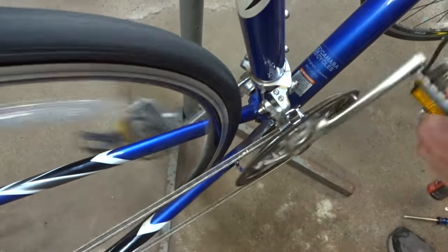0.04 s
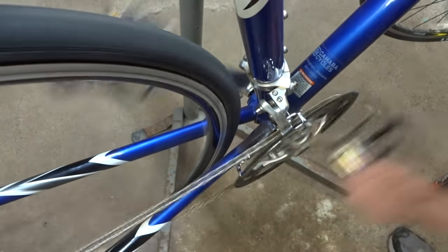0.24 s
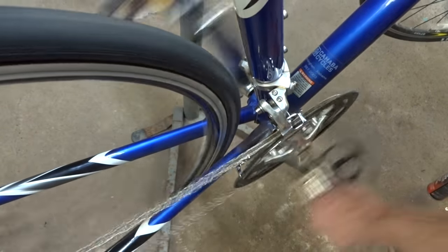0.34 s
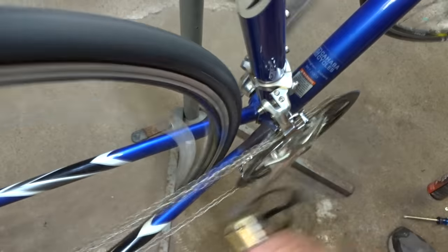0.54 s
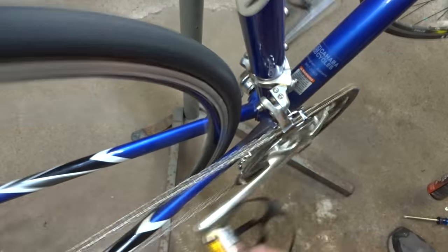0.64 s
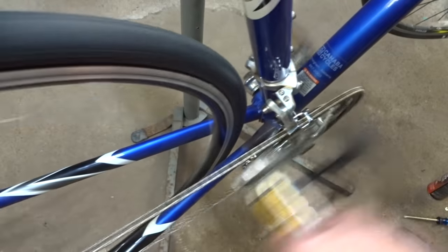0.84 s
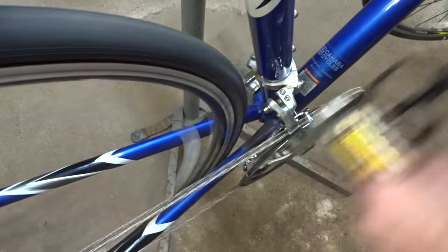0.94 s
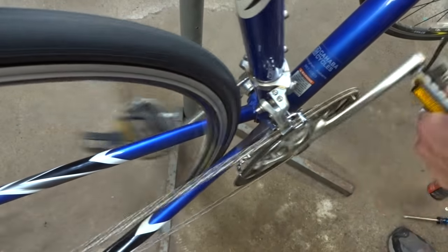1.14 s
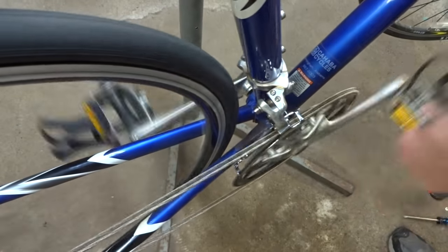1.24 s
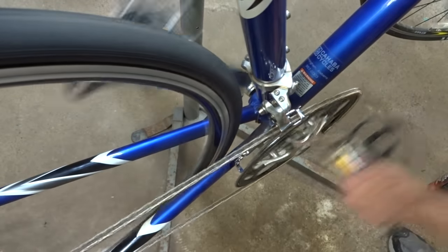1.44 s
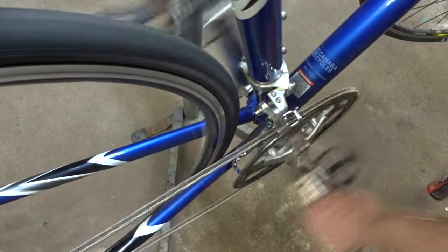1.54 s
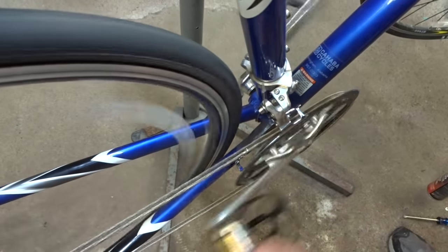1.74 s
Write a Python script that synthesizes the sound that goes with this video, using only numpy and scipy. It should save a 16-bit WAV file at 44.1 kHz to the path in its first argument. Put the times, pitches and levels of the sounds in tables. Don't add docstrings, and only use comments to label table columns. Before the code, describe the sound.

Close-up bicycle chain and gears: light ticking, a long jangling metal clatter, brisk uneven clicking, a second sharp burst of clanks, then steady ticks over faint wheel hum and quiet workshop air.

```python
import sys
import numpy as np
from scipy import signal
from scipy.fft import rfft, irfft
from scipy.io import wavfile
from scipy.ndimage import uniform_filter1d, minimum_filter1d

SR = 44100
rng = np.random.default_rng(int(sys.argv[2]) if len(sys.argv) > 2 else 0)


def put_to_file(sound):
    columns = np.atleast_2d(sound).T
    safe = np.clip(columns, -1, 1)
    whole_steps = np.round(safe * 32767)
    wavfile.write(sys.argv[1], SR, whole_steps.astype(np.int16))


def boost(x):
    u = np.asarray(x, float) / 20
    return 10 ** u


N = 79380

# f/Hz, level/dB per Hz
SHOP_AIR = [(12, -57), (20, -27), (150, -3), (499, 1.5), (2080, -8), (9670, -7.5), (16000, -12)]
# f/Hz, width/Hz, level/dB
WHEEL_HUM = [(76, 100, -63), (125.2, 23.3, -60.5), (174, 31, -56)]
# t/s, level over the hum/dB
SHUDDERS = [
    (.57, 9),
    (1.239, 18),
    (1.378, 14.5),
]

# t/s, peak level/dB
SEATS = [(0.0024, -46), (0.022, -37), (0.0474, -34), (0.0744, -26.5), (0.0927, -35), (0.116, -25),
         (0.1406, -31), (0.161, -35), (0.187, -22.5), (0.202, -29), (0.2214, -26), (0.754, -23),
         (0.784, -28), (0.827, -30), (0.85, -21), (0.864, -22), (0.8914, -24), (0.9144, -26.5),
         (0.9353, -21), (0.9494, -34), (0.9986, -29), (1.041, -25), (1.1204, -21.5), (1.1487, -24),
         (1.1787, -29), (1.1914, -35), (1.5843, -30), (1.6122, -26), (1.6274, -24), (1.6487, -24),
         (1.668, -21), (1.695, -23.5), (1.7235, -25.5), (1.746, -24), (1.7722, -23.5)]
# t/s, peak level/dB
SNAPS = [(0.0513, -31), (0.0984, -34), (0.141, -25), (0.1986, -32), (0.7344, -25), (0.7454, -31),
         (0.7627, -25), (0.7843, -34), (0.8084, -34), (0.826, -20.5), (0.8485, -35), (0.8754, -32),
         (0.9004, -23), (0.9084, -24), (0.918, -31), (0.9407, -21.5), (0.9554, -42), (0.961, -28),
         (0.986, -22.5), (1.0076, -22), (1.0154, -38), (1.0232, -18), (1.0415, -21), (1.053, -23),
         (1.0984, -26), (1.1204, -31), (1.1277, -28), (1.1374, -29), (1.1542, -24), (1.162, -20),
         (1.1814, -25), (1.191, -26), (1.6084, -32), (1.6212, -27), (1.637, -29), (1.644, -23),
         (1.6706, -23.5), (1.6872, -23.5), (1.694, -30), (1.722, -29), (1.733, -26.5), (1.7484, -26),
         (1.774, -33), (1.7816, -22.5)]
# f/Hz, level/dB per Hz
ROLLER_COLOUR = [(88, -25), (150, 12), (321, -7), (637, -36), (2600, 3.5), (9630, 18), (16000, -30)]
# f/Hz, width/Hz, level/dB
SEAT_RINGS = [(10000, 810, -10), (11000, 500, -26.5), (13200, 480, -2.5)]
# f/Hz, width/Hz, level/dB
PAWL_RINGS = [(6900, 520, 1), (8200, 2200, -4.5), (9500, 2000, 1)]

# t/s, level/dB, frame thud/dB, cage jingle/dB, f of the part struck/Hz
FIRST_SHIFT = [(0.2596, -6, -20, -4.5, 2770), (0.264, -16.5, -9, 11, 12800), (0.283, -14, -27, 2, 10500),
               (0.2918, -7, -23, -12, 2660), (0.3168, 1.5, -11, -17, 2690), (0.339, -8.5, -27, 3, 14200),
               (.346, -7, -10, 1, 3730), (0.3715, -3, -6, -4, 10350), (0.386, -11, -22, -10, 3540),
               (0.406, -4, -13.5, -3.5, 2690), (0.4286, -12, -6.5, -25, 2600),
               (0.4378, -17.5, -11, -10, 1244), (0.449, -7, -9.5, -23, 4760), (0.4906, -7, -14, -19, 2690),
               (0.5036, 2.5, -16.5, -8.5, 4200), (0.527, -8.5, -20, -12, 4180), (0.542, -6, -16, -21, 4000),
               (0.556, -5, -27, 2.5, 10550), (0.5542, -1, -36, -12, 5250), (0.563, -11.5, -27, -22, 2670),
               (0.581, -25, -30, 8, 10650), (0.61, -13.5, -9, 1, 2690), (0.6146, -4.5, -37, -17, 5250),
               (.628, -14, -16, -19, 2700)]
# t/s, level/dB, frame thud/dB, cage jingle/dB, f of the part struck/Hz
SECOND_SHIFT = [(1.228, -19, -1, 7.5, 426), (1.242, -29, -4, -17, 445), (1.25, -20.5, -7, -14, 4000),
                (1.3743, 0, -13, -5, 5400), (1.382, -16, -2, -4, 1270), (1.388, -5.5, -6, -6, 3060),
                (1.3997, -13.5, -4.5, -10, 1270), (1.401, -7.5, -29, -26, 3150),
                (1.408, -9, -17, -27, 2550), (1.415, -8.5, -3, -3, 3350), (1.42, -10.5, -26, 0.5, 10730),
                (1.425, -13, -22, -8, 13000), (1.428, -15, -25, -18, 2570), (1.441, -9, -25, -13, 2510),
                (1.4435, -5.5, -14, 2.5, 4750), (1.457, -16, -33, 1, 4250), (1.49, -20, -4, -17, 4250),
                (1.575, -18.5, -13, -26, 4120), (1.585, -22.5, -10.5, -8, 4200)]
# t/s, level/dB, frame thud/dB, cage
# jingle/dB, f of the part struck/Hz
KNOCKS = [(0.093, -20, -15, -8, 1170), (0.179, -27.5, -6, -10, 910), (0.2317, -15.5, -13.5, -10, 2680),
          (0.243, -11, -21, -4.5, 2600), (0.3093, -0.5, -4.5, -17, 1980), (0.685, -14, -4.5, 4, 10040),
          (0.6865, -16.5, -5.5, -20, 630), (0.8008, -23, -21, 0, 11000), (0.888, -23, -6.5, -4, 8400),
          (0.973, -18, -14, -16, 4306), (.909, -25.5, -6, -4, 745), (1.0272, -30.5, -24, 8.5, 14100),
          (1.0797, -11.5, -12, 4, 1010), (1.177, -29.5, -0.5, -10, 1040), (1.2229, -5.5, -3, -18, 1280),
          (1.2234, -15, -24, -18, 4280), (1.2246, -4, -15, -20, 2470), (1.632, -23.5, -13, -8, 1610),
          (1.672, -35, 5.5, -6, 1394)]
# t/s, level/dB, frame thud/dB, cage jingle/dB
CHAIN_DRAG = [(0.248, -43, 2, 0.5), (.27, -22.5, -12, -4), (0.316, -22.5, 5, 0.5), (0.459, -24, 4.5, -3),
              (.5, -41.5, 8, -0.5), (0.568, -29.5, 8.5, 5), (.64, -29, -4, -0.5), (.72, -56, 16, 12.5),
              (1.1, -38.5, 2, 1.5), (1.22, -45.5, 9.5, 7.5), (1.238, -24, 6.5, -11.5), (1.372, -39, 3.5, 3),
              (1.377, -27, -5, 4.5), (1.46, -24, -4, -7.5), (1.58, -50.5, 9, 3), (1.8, -87, -48, -13)]
# f/Hz, level/dB per Hz
CONTACT_COLOUR = [(88, -46), (150, -21), (420, -2.5), (1300, -9), (2000, -4), (2700, -3.5), (7000, -5.5),
                  (15000, -2.5)]
# f/Hz, width/Hz, level/dB
METAL_RINGS = [(1270, 114, 1), (1926, 33, -5.5), (2443, 29, -0.5), (2690, 50, -0.5), (3105, 81, -1.5),
               (4000, 55, 3), (4250, 110, 1), (4750, 50, 0.5), (5250, 230, 2), (7940, 50, -1),
               (9750, 1600, 9.5), (12670, 230, 4.5), (13900, 230, -18)]
# f/Hz, width/Hz, level/dB
FRAME_RINGS = [(250, 24, -6.5), (415, 18, -15.5), (553, 32, 5), (1072, 12, -1.5)]
ZONES_HZ = [1400, 2300, 5300, 8000]

BANDS_HZ = 100 * 2 ** np.arange(0, 7.3, 0.4)
RISE_S = 0.0005


def table(points, hz):
    points = np.array(points)
    return np.interp(np.log(hz), np.log(np.maximum(points[:, 0], 1)), points[:, 1])


def ring(x, hz, width):
    r = np.exp(-np.pi * np.clip(width, 5, hz) / SR)
    a = [1, -2 * r * np.cos(2 * np.pi * min(hz, SR / 2.2) / SR), r * r]
    return signal.lfilter([1, 0, -1], a, x) * np.sqrt((1 - r * r) / 2)


def broad(colour):
    shares = table(colour, BANDS_HZ) + 10 * np.log10(BANDS_HZ)
    shares = shares - 10 * np.log10(np.sum(10 ** (shares / 10)))
    return [(f, f / 4, db) for f, db in zip(BANDS_HZ, shares)]


def walk(rate):
    k = int(SR / rate)
    return uniform_filter1d(np.repeat(rng.standard_normal(N // k + 1), k), k)[:N]


def grit():
    sizes = boost(3 * np.minimum(rng.exponential(size=N), 5))
    return sizes / np.sqrt(np.mean(sizes ** 2))


def bursts(times, db, decay_s):
    hits = np.zeros(N)
    np.add.at(hits, np.clip(times * SR, 0, N - 1).astype(int), boost(db))
    decay = np.exp(-1 / (decay_s * SR))
    rise = np.exp(-1 / (RISE_S * SR))
    fading = signal.lfilter([1], [1, -decay], hits)
    return signal.lfilter([1 - rise], [1, -rise], fading)


def zones(hz):
    low = np.interp(np.log(hz), np.log(ZONES_HZ), [1, 0, 0, 0])
    high = np.interp(np.log(hz), np.log(ZONES_HZ), [0, 0, 0, 1])
    return low, high


def shop():
    hz = np.maximum(np.arange(N // 2 + 1) * SR / N, 1)
    air = irfft(rfft(rng.standard_normal((2, N))) * boost(table(SHOP_AIR, hz)), N)
    return air / air.std() * boost([[-43], [-50.5]])


def room(x):
    t60_s, treble_t60_s = 0.76, 0.23
    t = np.arange(SR) / SR
    noise = rng.standard_normal((2, SR))
    low = signal.lfilter([0.3], [1, -0.7], noise)
    tail = low * boost(-60 * t / t60_s) + (noise - low) * boost(-60 * t / treble_t60_s)
    tail = tail * np.clip(t / 0.025, 0, 1)
    tail = tail / np.sqrt(np.sum(tail[0] ** 2)) * boost([[-10], [-24]])
    return signal.fftconvolve(x[None], tail, axes=1)[:, :N]


def wheel():
    jolts = bursts(*np.array(SHUDDERS).T, decay_s=0.076)
    swell = 1 + uniform_filter1d(jolts, size=SR // 30)
    out = 0
    for hz, width, db in WHEEL_HUM:
        hum = ring(ring(rng.standard_normal(N), hz, width), hz, 3 * width)
        out = out + boost(db - 27.5 + 2 * walk(5.35)) * swell * hum
    return out


def ticks(events, parts, extra_db, decay_s, contact):
    times, db = np.array(events).T
    out = 0
    for hz, width, part_db in parts:
        scatter_db = 2 * rng.standard_normal(len(times))
        push = bursts(times, db + extra_db + scatter_db, decay_s)
        out = out + boost(part_db) * ring(push * contact * rng.standard_normal(N), hz, width)
    return out


def teeth():
    contact = grit()
    seated = ticks(SEATS, broad(ROLLER_COLOUR) + SEAT_RINGS, -10, 0.004, contact)
    snapped = ticks(SNAPS, PAWL_RINGS, -3.5, 0.0005, contact)
    return seated + snapped


def pings(blows):
    t = np.arange(SR // 20) / SR
    hz = blows[:, 4:]
    low, high = zones(hz)
    db = blows[:, 1:2] + low * (blows[:, 2:3] + 8) + high * (blows[:, 3:4] + 4) - 10
    detune, phase = 0.025 * rng.standard_normal((2, len(hz), 1))
    partner = np.sin(2 * np.pi * (hz * (1 + detune) * t + 20 * phase))
    tone = np.sin(2 * np.pi * hz * t) + 0.5 * partner
    fade = np.exp(-t / 0.0048) * (1 - np.exp(-t / RISE_S))
    out = np.zeros(N + len(t))
    starts = (blows[:, :1] * SR).astype(int)
    np.add.at(out, starts + np.arange(len(t)), boost(db) * tone * fade)
    return out[:N]


def clatter():
    t = np.arange(N) / SR
    parts = broad(CONTACT_COLOUR)
    parts = parts + [(f, max(w, 55), db - 18) for f, w, db in METAL_RINGS]
    parts = parts + [(f, w, db - 26) for f, w, db in FRAME_RINGS]
    # blows, decay of the rattle in s, strength of the sharp crack
    groups = [(np.array(FIRST_SHIFT + SECOND_SHIFT), 0.0043, 1.5), (np.array(KNOCKS), 0.0032, 4)]
    drag = np.array(CHAIN_DRAG)
    drag_db, drag_thud, drag_jingle = [np.interp(t, drag[:, 0], drag[:, k]) for k in (1, 2, 3)]
    contact, shake, out = grit(), walk(90), 0
    for k, (hz, width, db) in enumerate(parts):
        low, high = zones(hz)
        flicker_db = 2.5 * (shake + walk(59.97))
        push = boost(drag_db + low * drag_thud + high * drag_jingle + flicker_db)
        crack = np.zeros(N)
        for blows, decay_s, sharp in groups:
            times, level, thud, jingle, struck_hz = blows.T
            octaves_away = np.log2(hz / struck_hz)
            struck_db = 5 * np.exp(-(octaves_away / 0.09) ** 2)
            scatter_db = 1.5 * rng.standard_normal(len(blows))
            size = level + low * (thud + 12) + high * (jingle + 4) - 7 + scatter_db + struck_db
            push = np.hypot(push, bursts(times, size, decay_s))
            np.add.at(crack, (times * SR + 8).astype(int), sharp * boost(size))
        rattle = push * contact * rng.standard_normal(N)
        out = out + boost(db) * ring(rattle + crack * (-1) ** k, hz, width)
    return signal.sosfilt(signal.butter(4, 170, "high", fs=SR, output="sos"), out)


def scene():
    spread = wheel() + teeth() + clatter()
    bike = spread + pings(np.array(FIRST_SHIFT + SECOND_SHIFT + KNOCKS))
    early = rng.standard_normal(400) * np.exp(-np.arange(400) / 120)
    early = signal.lfilter([1, 0, -1], [1, -1.06, 0.1], early)
    side = boost(-19) * np.convolve(bike, early / np.linalg.norm(early))[:N]
    mid, side = np.array([bike, side]) + room(spread) + shop()
    return np.array([mid + side, mid - side])


def band_limit(x):
    return signal.sosfilt(signal.butter(12, 16820, fs=SR, output="sos"), x)


def record(dry):
    limit_db, release_s, squeeze = -7, 0.02, 0.65
    gain = np.minimum(1, boost(limit_db) / (np.abs(dry).max(axis=0) + 1e-9))
    span = int(release_s * SR / 8)
    smooth_gain = uniform_filter1d(minimum_filter1d(gain, 2 * span), span)
    dull = signal.lfilter(*signal.butter(1, 14500, fs=SR), dry)
    held = dull * smooth_gain ** squeeze
    cut = signal.sosfiltfilt(signal.butter(12, 15750, fs=SR, output="sos"), held)
    finished = cut + boost(-30) * (held - cut)
    return band_limit(finished)


dry = scene()
out = record(dry)
put_to_file(out)
```